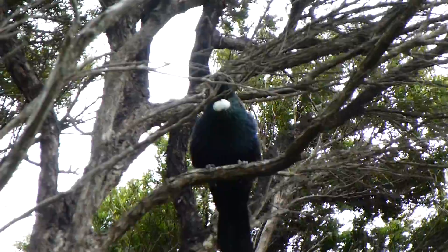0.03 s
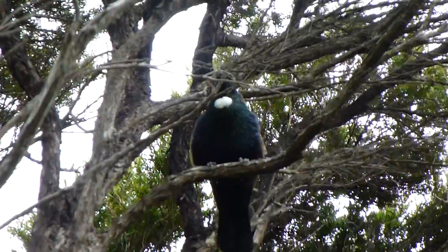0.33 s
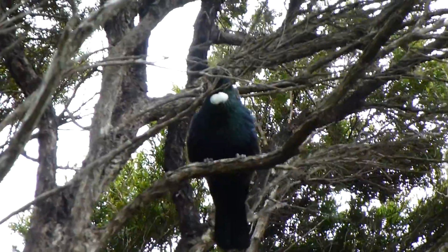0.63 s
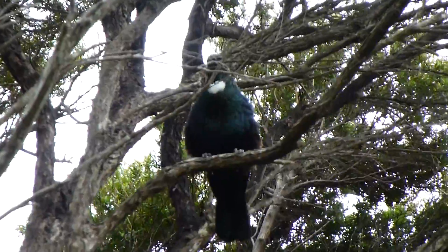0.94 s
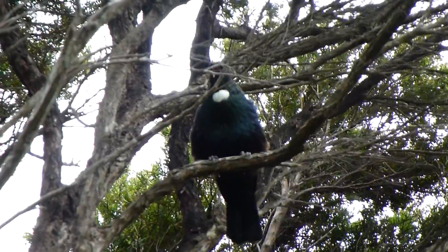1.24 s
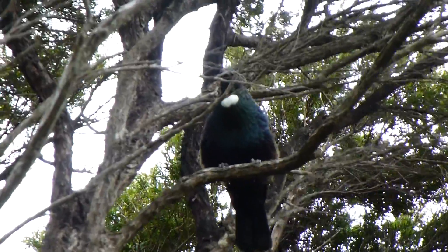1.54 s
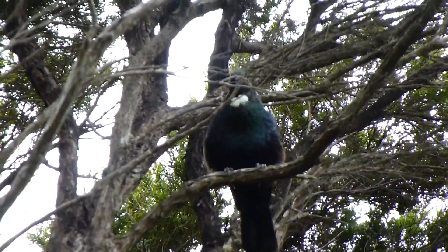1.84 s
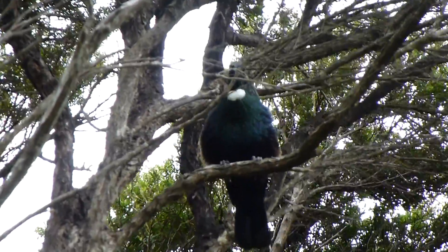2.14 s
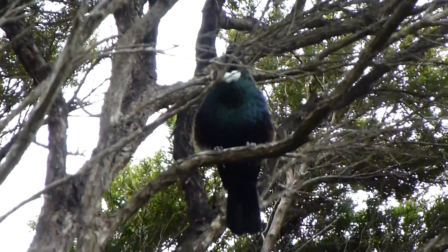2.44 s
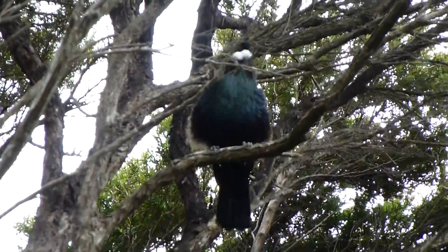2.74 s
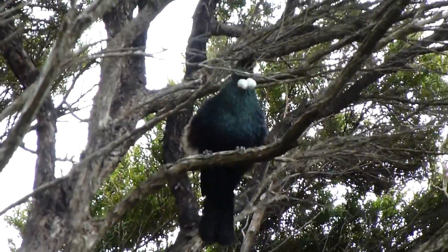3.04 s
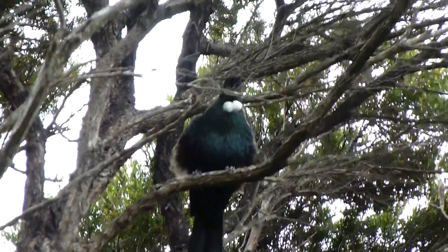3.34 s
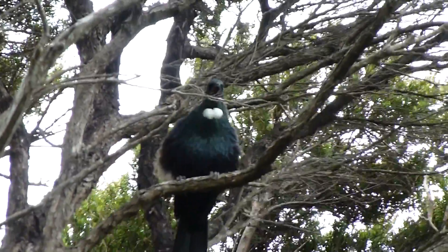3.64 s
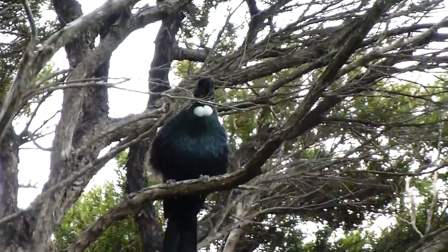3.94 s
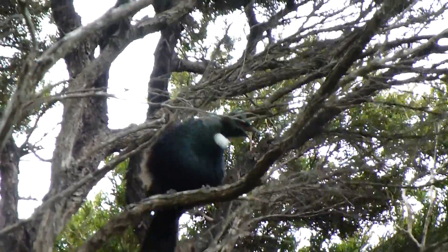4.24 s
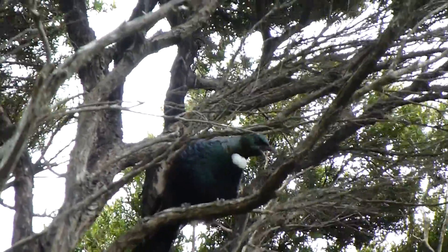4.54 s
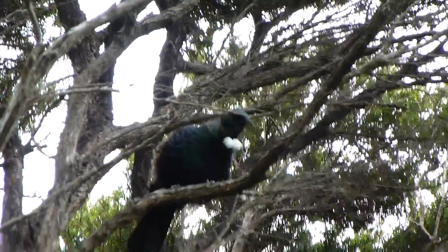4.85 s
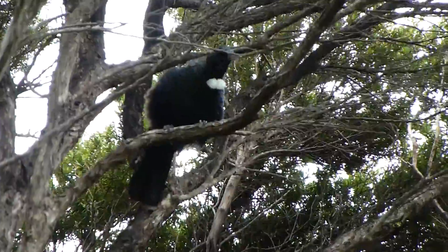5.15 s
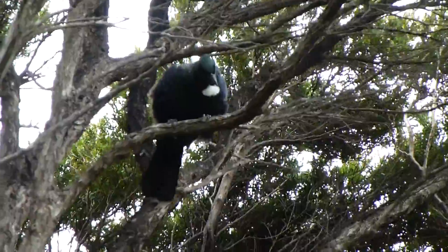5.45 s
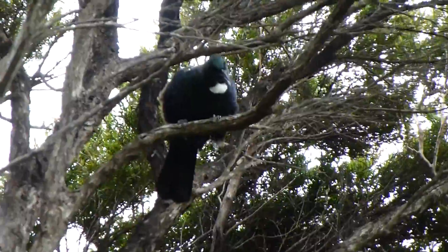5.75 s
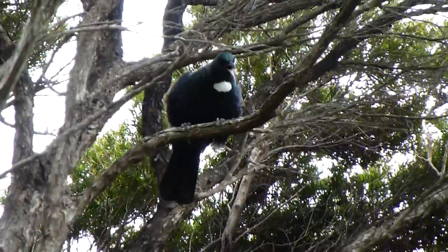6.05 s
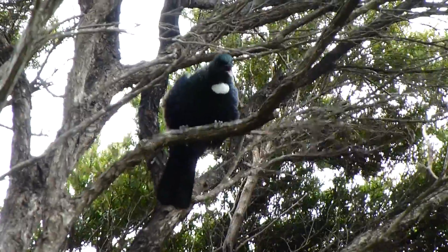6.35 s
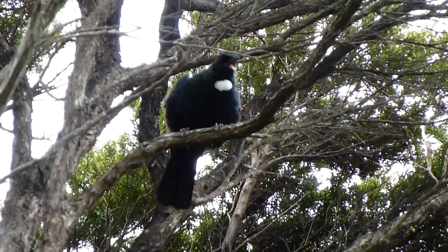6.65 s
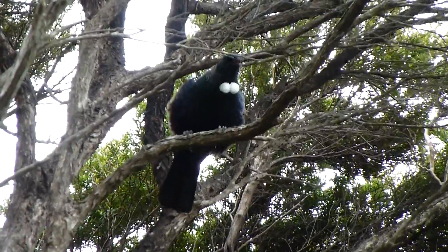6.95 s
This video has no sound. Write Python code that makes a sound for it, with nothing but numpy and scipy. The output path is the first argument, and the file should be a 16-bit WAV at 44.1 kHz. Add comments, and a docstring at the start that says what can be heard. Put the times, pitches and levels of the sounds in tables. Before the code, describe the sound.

After a moment of silence, a faint, steady rush of distant wind or surf begins at about 0.7 seconds and continues throughout. One bird sings straight ahead, its notes lightly echoed by nearby trees. A quick, high five-beat trill comes at 1.4 seconds. Between 2 and 2.5 seconds there are faint whistles, a squeak and sharp, hollow clicks. A pure bell-like note rings at 2.7 seconds, followed by a short, harsh rasp at 3. Scattered squeaks and thin, very high notes run from 3.4 to 4.6 seconds, leading into a louder, brief high buzz at about 4.7. From 5 to 6.2 seconds come softer whistles that climb, fall or drop suddenly to a lower tone. Rough downward chirps follow, then a rising and falling whistle at 6.6 seconds and a quick cluster of squeaks around 7.

```python
"""A tui in the trees

A tui sings from a branch. Air shakes thin skins on the two sides of its voice box, the syrinx,
making a trill, hollow clicks, whistles, squeaks, a bell-like note, a rasp and a buzz.
Nearby trunks throw short echoes and the leaves add a soft tail.
Distant wind or surf rushes steadily behind."""
import sys
import numpy as np
from scipy import signal
from scipy.fft import rfft, irfft, next_fast_len
from scipy.io import wavfile
from scipy.ndimage import map_coordinates

SR = 44100
rng = np.random.default_rng(int(sys.argv[2]) if len(sys.argv) > 2 else 0)


def store_pcm(level_fs):
    """Save levels as 16-bit WAV."""
    pcm = np.round(np.clip(level_fs, -1, 1) * 32767).astype(np.int16)
    wavfile.write(sys.argv[1], SR, np.atleast_2d(pcm).T)


N = 317079

# how loud the wind is (time [s], level [dB])
WIND_LEVELS = [(.7, -46.5), (3.8, -47), (4.6, -46.5), (7.2, -46)]
# the wind's tone colour (frequency [Hz], level [dB])
WIND_SPECTRUM = [(30, -26), (55, -29.5), (110, -10.5), (190, -3), (330, -2.5), (650, -4.5), (1400, -14),
                 (2100, -22.5), (3200, -28.5), (9000, -31), (15500, -39)]
# how alike the wind is in both ears (frequency [Hz], likeness [-1 to 1])
WIND_LIKENESS = [(130, 0.98), (650, 0.85), (1400, 0.081), (3100, -0.38), (6800, 0.59)]
# beats of the opening trill (time [s], tick level [dB], lower note level [dB])
TRILL_BEATS = [(1.356, -40.5, -50), (1.409, -36, -44.5), (1.458, -33, -39), (1.508, -32.5, -43),
               (1.560, -35, -47)]
# air hissing through the beak (frequency [Hz], level [dB])
HISS_SPECTRUM = [(2000, -19), (2900, -6), (3900, -27), (5200, -2.5), (6800, -12.5), (8300, -16), (9800, -5),
                 (11500, -7), (15000, -22)]
# hollow clicks (time [s], length [s], start pitch [Hz], end pitch [Hz], level [dB])
CLICK_NOTES = [(2.164, 0.011, 2155, 1457, -22), (2.171, 0.0091, 1890, 860, -25),
               (2.4854, 0.0031, 2350, 1180, -24.5), (2.502, 0.0061, 2350, 1410, -27.5),
               (3.722, 0.033, 2340, 1665, -50), (3.778, 0.031, 2430, 1710, -52)]
# the throat's ring after a click (frequency [Hz], width [Hz], gain [dB])
THROAT_RINGS = [(1890, 460, -6), (4020, 250, 9), (12500, 1600, -1)]
# whistles (time [s], length [s], top pitch [Hz], level [dB], roughness [0-1])
WHISTLE_NOTES = [(2.015, 0.044, 5140, -52.5, 0.5), (2.017, 0.051, 1940, -55, 0.56),
                 (3.064, 0.073, 8180, -44.5, .6), (4.092, 0.044, 3673, -45, 0.03),
                 (4.174, 0.032, 11500, -30.5, 0.16), (5.162, 0.17, 5160, -49, .1),
                 (5.391, 0.27, 2376, -57.5, 0.12)]
# squeaks (time [s], length [s], top pitch [Hz], scoop up [share of pitch],
# base tone [dB], octave [dB], third harmonic [dB], roughness [0-1])
SQUEAK_NOTES = [(2.115, 0.051, 3265, 0.044, -71, -37, -56, 0.05),
                (3.391, 0.037, 3090, .25, -56.5, -50.5, -61, 0.42),
                (3.427, 0.034, 3100, .2, -54.5, -42.5, -48.5, .35),
                (3.451, 0.042, 3310, 0.22, -80, -40, -68, 0.03),
                (4.147, 0.0296, 2880, 0.218, -63, -48, -56.5, 0.55),
                (4.165, 0.0383, 3510, 0.095, -49, -36.5, -46, 0.06),
                (4.479, 0.061, 2612, 0.038, -50, -41, -60, 0.03),
                (4.548, 0.034, 2651, 0.036, -40, -36, -60, .02),
                (4.902, 0.08, 1535, 0.0043, -55, -42.5, -53, .04),
                (6.867, 0.038, 3546, .09, -48, -41.5, -52, 0.04),
                (6.895, 0.044, 3656, 0.23, -49, -36.5, -50.5, 0),
                (6.949, 0.034, 3630, 0.072, -45, -38.5, -52.5, 0.03),
                (6.977, 0.04, 3606, 0.19, -48.5, -38, -53.5, 0.04)]
# how loud the rasp is (time [s], throat level [dB], beak level [dB])
RASP_LEVELS = [(3.001, -35, -35), (3.013, -32.5, -35), (3.026, -33, -29.5), (3.042, -28.5, -28.5),
               (3.058, -38, -29), (3.069, -42, -28), (3.082, -44, -35.5), (3.125, -80, -51)]
# the rasp's tone colour in the throat and at the beak (frequency [Hz], level [dB])
THROAT_SPECTRUM = [(500, -48), (950, -2.5), (2000, 0.5), (3000, 0), (3600, -12), (6000, -51)]
BEAK_SPECTRUM = [(2500, -43), (3600, -24), (4100, -10.5), (4500, -12), (5050, 0.5), (5600, -9.5),
                 (6400, -16), (7200, -6.5), (8500, -19), (11000, -23), (15000, -49)]
# notes that slide down (time [s], length [s], start pitch [Hz], end pitch [Hz],
# base tone [dB], octave [dB], roughness [0-1])
SLUR_NOTES = [(3.723, 0.048, 2645, 2222, -60, -45.5, 0.6), (3.784, 0.0275, 2787, 2356, -61, -36.5, 0.5),
              (4.53, 0.02, 2570, 2280, -48.5, -49, 0.59), (5.005, 0.057, 2570, 1675, -46.5, -77, 0.09),
              (5.702, 0.19, 2570, 2170, -86, -67, 0.56), (6.232, 0.031, 2690, 2230, -42, -44, 0.53),
              (6.258, 0.0095, 2500, 1650, -65, -45.5, 0.46), (6.259, .05, 2455, 1896, -46, -41.5, 0.26),
              (6.362, 0.041, 2480, 1816, -44, -40.5, 0.1), (6.412, 0.031, 2385, 1667, -44.5, -37, 0.11),
              (6.484, .044, 2570, 1830, -40.5, -41, 0.19), (7.079, .02, 3090, 2740, -74, -47.5, 0.44),
              (7.102, .029, 3040, 2550, -73, -45, 0.42), (7.153, .042, 3580, 2680, -70, -38.5, 0.41)]
# how loud the buzz is (time [s], level [dB])
BUZZ_LEVELS = [(4.665, -40.5), (4.705, -29.5), (4.745, -24.5), (4.775, -26.5), (4.805, -23.5), (4.879, -23)]
# whistles that climb and fall (time [s], rise [s], fall [s], start pitch [Hz], top pitch [Hz],
# end pitch [Hz], rise level [dB], fall level [dB], bend [1 = straight glide])
ARCH_NOTES = [(5.174, .114, .095, 6600, 10390, 6230, -37.5, -36, 2.46),
              (5.584, 0.062, 0.0161, 2260, 3930, 2200, -45.5, -35.5, 1.42),
              (6.592, .063, .165, 1800, 3480, 1550, -40.5, -41.5, 1.45)]
# high notes that drop (time of drop [s], high note length [s], high pitch [Hz], low tone length [s])
PLUNGE_NOTES = [(5.879, .014, 4720, .13), (6.068, 0.0095, 4460, .12)]
# echoes from the trunks (delay [s], gain [factor])
TRUNK_ECHOES = [(.001, 0.24), (.0037, 0.27), (.0076, 0.46), (.0107, 0.41)]
# the tail from the leaves (frequency [Hz], time to fade by 60 dB [s])
LEAF_FADE = [(1000, 0.31), (7000, 0.28), (14000, 0.094)]

SETTLE = .22  # share of a note's length in which its scoop shrinks to about a third


def amp(db):
    """Turn decibels into a gain."""
    return 10 ** (np.asarray(db) / 20)


def unit(x):
    """Scale x to an average strength (rms) of 1."""
    return x / np.sqrt(np.mean(x ** 2) + 1e-20)


def along(points, hz):
    """Read between (frequency, value) points on a log frequency scale."""
    freqs, values = np.transpose(points)
    return np.interp(np.log(hz + 1), np.log(freqs + 1), values)


def curves(rows):
    """Join timed rows with straight lines, one curve for each value column."""
    times, *columns = np.transpose(rows)
    return [np.interp(np.arange(times[0], times[-1], 1 / SR), times, column) for column in columns]


def wobble(rate, size):
    """A smooth curve through `rate` random values a second."""
    return map_coordinates(rng.standard_normal(int(size * rate / SR) + 4), [np.arange(size) * rate / SR])


def filtered(x, response):
    """Multiply each frequency in x by the gain that `response` gives it."""
    size = x.shape[-1]
    padded = next_fast_len(size + 8192)
    return irfft(rfft(x, padded) * response(np.fft.rfftfreq(padded, 1 / SR)), padded)[..., :size]


def coloured(x, spectrum):
    """Give x a tone colour, at strength 1."""
    return unit(filtered(x, lambda hz: amp(along(spectrum, hz))))


def add(track, time, x):
    """Mix x into the track at a time in seconds."""
    part = track[round(time * SR):][:len(x)]
    part += x[:len(part)]


def progress(length):
    """A ramp from 0 to 1 (called u below) over a length in seconds."""
    return np.linspace(0, 1, int(length * SR))


def swell(u):
    """The rise and fall of a note's loudness."""
    return np.sin(np.pi * u).clip(0) ** .6


def tone(hz, harmonics_db):
    """A vibrating skin makes harmonics: its base pitch, twice that (the octave), and so on."""
    phase = 2 * np.pi * np.cumsum(hz) / SR
    harmonics = (amp(db) * np.sin(k * phase) * (k * hz < SR / 2) for k, db in enumerate(harmonics_db, 1))
    return np.sqrt(2) * sum(harmonics)


def note(hz, harmonics_db, rough, jitter=.08, flutter_db=5, hiss_db=-10, waver=.012, waver_db=3):
    """The syrinx follows a pitch, wavering a little; a rough note also shakes and hisses."""
    size = len(hz)
    shake, flutter = wobble(900, size), wobble(900, size)
    # a quick random waver moves pitch and level together; the purest notes hold still
    wavering = np.tanh(10 * rough) * wobble(170, size)
    voice = tone(hz * (1 + jitter * rough * shake + waver * wavering), harmonics_db)
    voice *= amp(flutter_db * rough * flutter + waver_db * wavering)
    hiss = coloured(rng.standard_normal(size), HISS_SPECTRUM)
    return voice + rough * amp(np.max(harmonics_db, axis=0) + hiss_db) * hiss


def wind(sway_db=.87, lean_left_db=.5):
    """Far wind or surf: an even rush of noise that sways slightly in level."""
    def response(hz):
        angle = np.arccos(np.clip(along(WIND_LIKENESS, hz), -1, 1)) / 2
        return amp(along(WIND_SPECTRUM, hz)) * [np.cos(angle), np.sin(angle)]

    # both ears share mid; side sets them apart
    mid, side = filtered(rng.standard_normal((2, N)), response)
    db = np.interp(np.arange(N) / SR, *np.transpose(WIND_LEVELS)) + sway_db * wobble(5.022, N)
    return unit(np.array([mid + side, mid - side])) * amp(db) * amp([[lean_left_db], [-lean_left_db]])


def trill(tick_hz=5160, sag=.057, tick_s=.011, low_hz=4325, low_delay_s=.023, low_s=.028):
    """The two sides of the syrinx take turns: a short sagging tick, then a steady lower note."""
    out = np.zeros(N)
    for time, tick_db, low_db in TRILL_BEATS:
        u = progress(tick_s)
        tick = note(tick_hz * (1 - sag * u), [tick_db, tick_db - 30], rough=.25)
        add(out, time, swell(u) * tick)
        u = progress(low_s)
        low = note(np.full(len(u), low_hz), [low_db, -np.inf, low_db - 30], rough=.15)
        add(out, time + low_delay_s, swell(u) * low)
    return out


def clicks(octave_db=-25, puff_db=-21, direct_db=-3):
    """The pitch dives very fast, with a puff of air, and leaves the throat ringing."""
    def throat(hz):
        rings = (amp(db) * 1j * hz * width / (centre ** 2 - hz ** 2 + 1j * hz * width)
                 for centre, width, db in THROAT_RINGS)
        return amp(direct_db) + sum(rings)

    out = np.zeros(N)
    # a faint click follows each tick of the trill
    trill_clicks = [(time + .006, .011, 2350, 1830, db - 18) for time, db, _ in TRILL_BEATS]
    for time, length, start_hz, end_hz, db in trill_clicks + list(CLICK_NOTES):
        u = progress(length)
        puff = amp(puff_db) * coloured(rng.standard_normal(len(u)), HISS_SPECTRUM)
        dive = tone(start_hz * (end_hz / start_hz) ** u, [0, octave_db])
        add(out, time, amp(db) * swell(u) * (dive + puff))
    return filtered(out, throat)


def whistles(scoop=.08, octave_db=-24):
    """Thin notes, some clear and some rough, ease up to their pitch."""
    out = np.zeros(N)
    for time, length, top_hz, db, rough in WHISTLE_NOTES:
        u = progress(length)
        hz = top_hz * (1 - scoop * np.exp(-u / SETTLE))
        add(out, time, swell(u) * note(hz, [db, db + octave_db], rough))
    return out


def squeaks(hoarseness=3.6):
    """Each squeak starts low and hoarse and clears as it reaches its pitch; its octave is loudest."""
    out = np.zeros(N)
    for time, length, top_hz, scoop, db, octave_db, third_db, rough in SQUEAK_NOTES:
        u = progress(length)
        below = scoop * np.exp(-u / SETTLE)
        harmonics_db = [db, octave_db, third_db, third_db - 10]
        add(out, time, swell(u) * note(top_hz * (1 - below), harmonics_db, rough + hoarseness * below))
    return out


def bell_note(time=2.686, hz=1076, db=-30, rise_s=.027):
    """One pure bell-like note swells quickly and rings away."""
    out = np.zeros(N)
    t = np.arange(SR // 2) / SR
    voice = tone(np.full(len(t), hz), [db, -np.inf, db - 39, db - 38])
    loudness = (t / rise_s * np.exp(1 - t / rise_s)) ** 2
    add(out, time, voice * loudness)
    return out


def rasp(slaps_per_s=300, scatter=.4, fade=1.4):
    """The skins slap unevenly, each slap freeing a puff; the sound moves from throat to opening beak."""
    out = np.zeros(N)
    throat_db, beak_db = curves(RASP_LEVELS)
    size = len(beak_db)
    slap_count = np.cumsum(slaps_per_s * np.exp(scatter * wobble(slaps_per_s, size))) / SR
    puffs = rng.standard_normal(size) * np.exp(-fade * (slap_count % 1))
    throat = amp(throat_db) * coloured(puffs, THROAT_SPECTRUM)
    beak = amp(beak_db) * coloured(puffs, BEAK_SPECTRUM)
    add(out, RASP_LEVELS[0][0], throat + beak)
    return out


def slurs(harsh_db=33):
    """Each note slides down evenly; the rougher it is, the stronger its upper harmonics."""
    out = np.zeros(N)
    for time, length, start_hz, end_hz, db, octave_db, rough in SLUR_NOTES:
        u = progress(length)
        hz = start_hz * (end_hz / start_hz) ** u
        upper_db = octave_db + harsh_db * rough
        add(out, time, swell(u) * note(hz, [db, octave_db, upper_db - 32, upper_db - 37], rough))
    return out


def buzz(high_hz=8200, low_hz=2950, first_gap_s=.0058, slowing=.0495, sweep=.2, jitter=.017):
    """A slowing run of tiny upward chirps, high on one side of the syrinx and low on the other."""
    out = np.zeros(N)
    db, = curves(BUZZ_LEVELS)
    size = len(db)
    rate = 1 / (first_gap_s + slowing * np.arange(size) / SR)
    place = np.cumsum(rate) / SR % 1 - .5  # -0.5 to 0.5 across each chirp
    bend = 1 + sweep * place + jitter * wobble(1200, size)
    high = tone(high_hz * bend, [0]) * np.exp(-(place / .16) ** 2)
    low = tone(low_hz * bend ** 2, [-14]) * np.exp(-(place / .11) ** 2)
    puffs = rng.standard_normal(size) * np.exp(-(place / .42) ** 2)
    hiss = amp(-21) * coloured(puffs, HISS_SPECTRUM)
    add(out, BUZZ_LEVELS[0][0], amp(db) * (high + low + hiss))
    return out


def arches(fade_in_s=.0077, fade_out_s=.017, weak_above_hz=9300, octave_below_hz=2280):
    """The pitch climbs fast, levels off, then falls fast and levels off again."""
    out = np.zeros(N)
    for time, rise, fall, start_hz, top_hz, end_hz, rise_db, fall_db, bend in ARCH_NOTES:
        up = top_hz + (start_hz - top_hz) * (1 - progress(rise)) ** bend
        down = end_hz + (top_hz - end_hz) * (1 - progress(fall)) ** bend
        hz = np.concatenate([up, down])
        t = np.arange(len(hz)) / SR
        db = np.interp(t, [rise / 2, rise + fall / 2], [rise_db, fall_db])
        db -= 45 * np.log2(hz / weak_above_hz).clip(0)
        # at low pitch the throat favours the octave over the base tone
        base_to_octave = (hz / octave_below_hz) ** 8.7
        base_db = db - 20 * np.log10(1 + 1 / base_to_octave)
        octave_db = db - 20 * np.log10(1 + base_to_octave)
        fade = np.minimum(t / fade_in_s, (rise + fall - t) / fade_out_s).clip(0, 1)
        add(out, time, note(hz, [base_db, octave_db], rough=.082) * fade)
    return out


def plunges(drop_s=.012, low_hz=1994, sag=.023):
    """A brief high note drops at once to a low tone, which hangs on with its octave and sags a little."""
    out = np.zeros(N)
    for time, high_s, high_hz, low_s in PLUNGE_NOTES:
        u = progress(high_s + drop_s / 2)
        high = swell(u) * note(high_hz * (1 - sag * u), [-47], rough=.25)
        add(out, time - high_s, high)
        u = progress(drop_s)
        drop = swell(u) * note(high_hz * (low_hz / high_hz) ** u, [-43], rough=.25)
        add(out, time, drop)
        u = progress(low_s)
        low = swell(u) * note(low_hz * (1 + sag * (.5 - u)), [-51, -52], rough=.082)
        add(out, time + drop_s / 2, low)
    return out


def tree_echoes(song, direct_db=-3, tail_db=-11, width=.16, pan=.29):
    """Trunks echo from left and right in turn; twigs and leaves scatter a short tail."""
    hz, t, noise = signal.stft(rng.standard_normal((2, SR // 2)), SR, nperseg=256)
    fade = amp(-60 * t / along(LEAF_FADE, hz)[:, None])
    mid, side = signal.istft(noise * fade, SR, nperseg=256)[1]
    # what each ear would hear after one sharp tap
    answer = np.array([mid + width * side, mid - width * side])
    answer *= amp(tail_db) / np.linalg.norm(answer[0])
    answer[:, 0] = amp(direct_db)
    for k, (delay, gain) in enumerate(TRUNK_ECHOES):
        left_right = 1 + (-1) ** k * pan * np.array([1, -1])
        answer[:, round(delay * SR)] += amp(direct_db) * gain * left_right
    return signal.fftconvolve(song[None], answer, axes=1)[:, :N]


def scene():
    """The bird straight ahead among the trees, the wind all around."""
    song = trill() + squeaks() + whistles() + slurs() + plunges() + arches()
    song += clicks() + bell_note() + rasp() + buzz()
    return tree_echoes(song) + wind()


def record(dry, start_s=.688, top_hz=15600):
    """The sound opens after a moment of silence, with the very highest treble cut away."""
    started = np.arange(N) / SR >= start_s
    return filtered(dry * started, lambda hz: hz < top_hz)


dry = scene()
out = record(dry)
store_pcm(out)
```